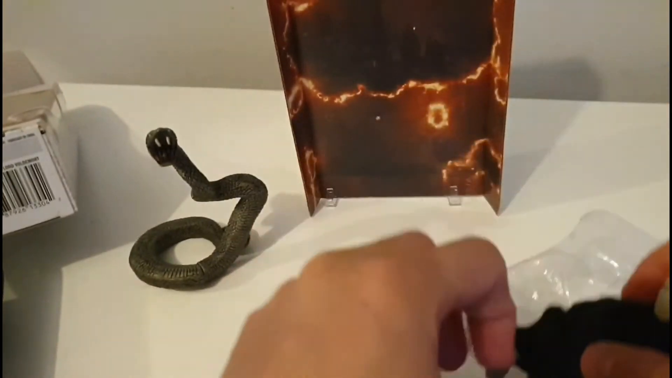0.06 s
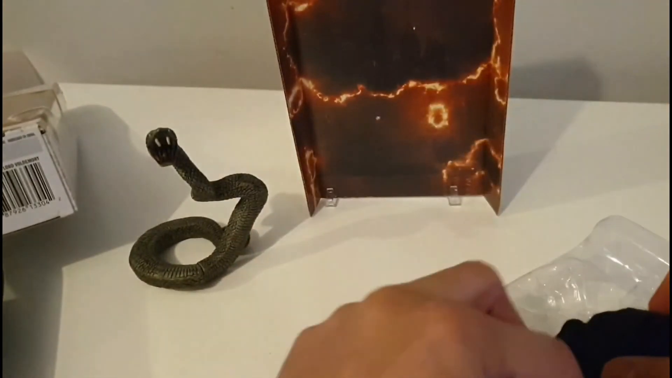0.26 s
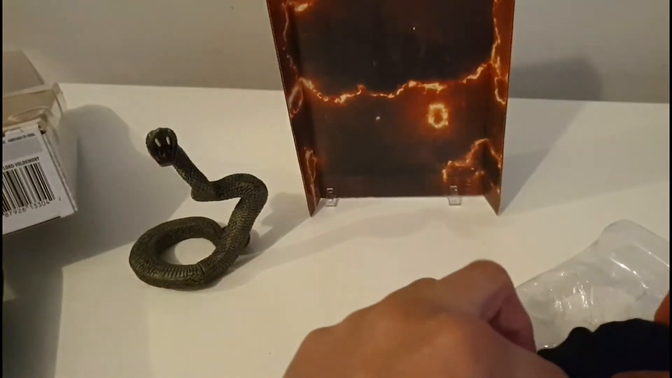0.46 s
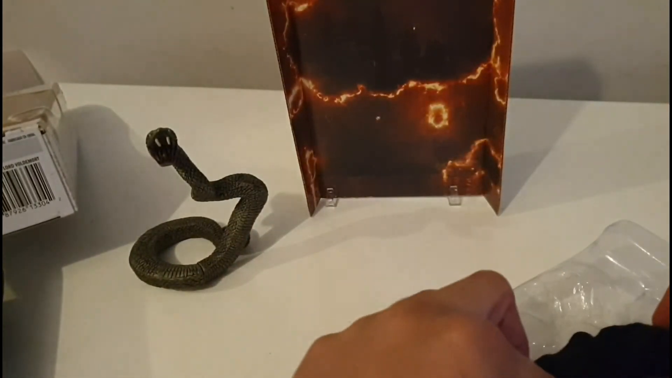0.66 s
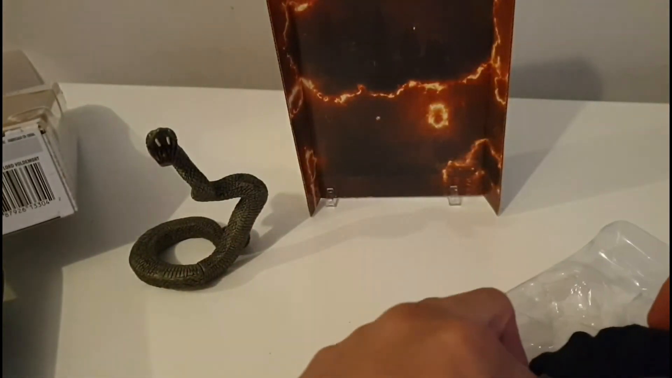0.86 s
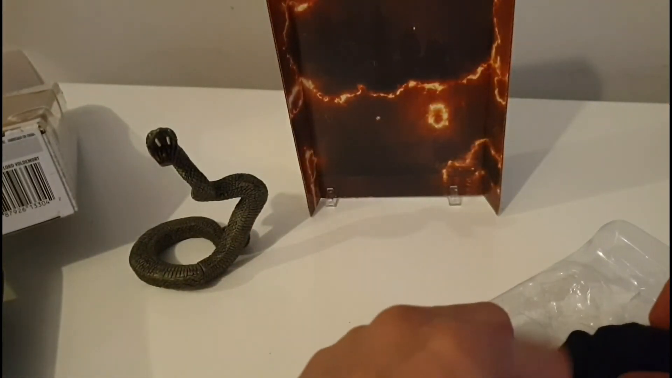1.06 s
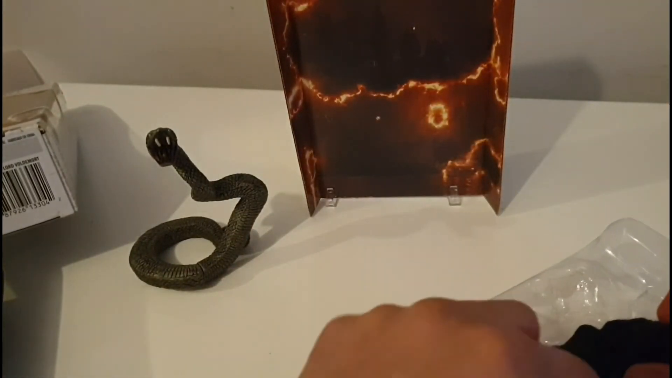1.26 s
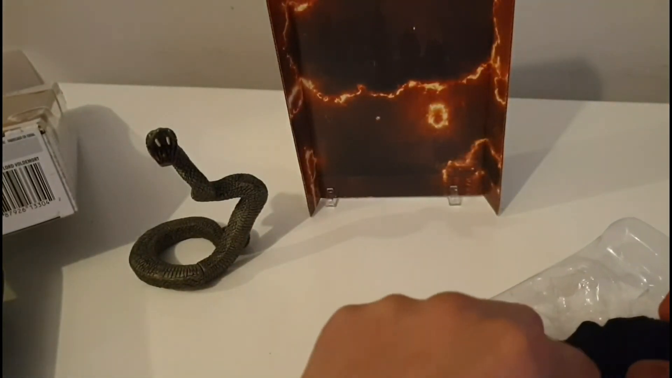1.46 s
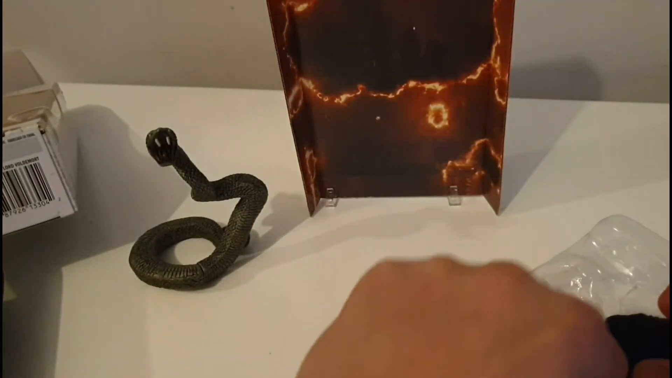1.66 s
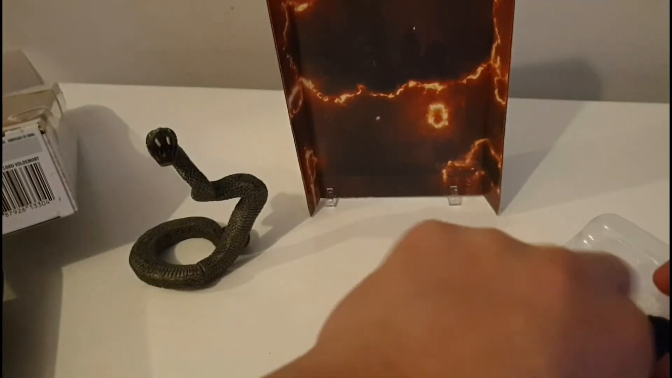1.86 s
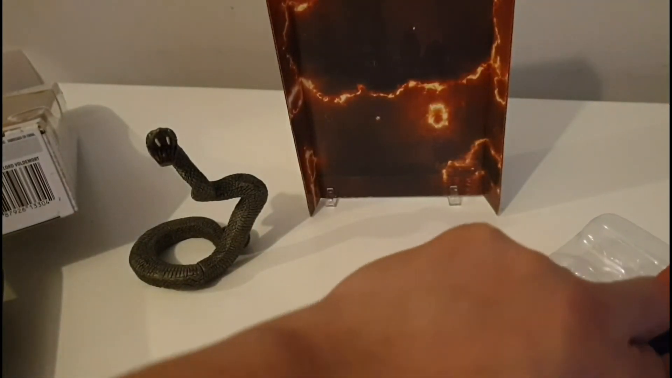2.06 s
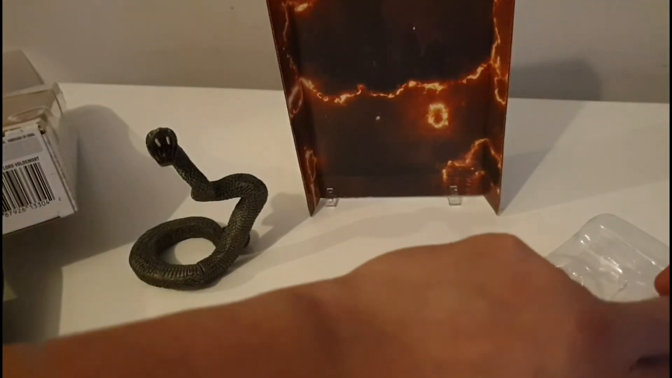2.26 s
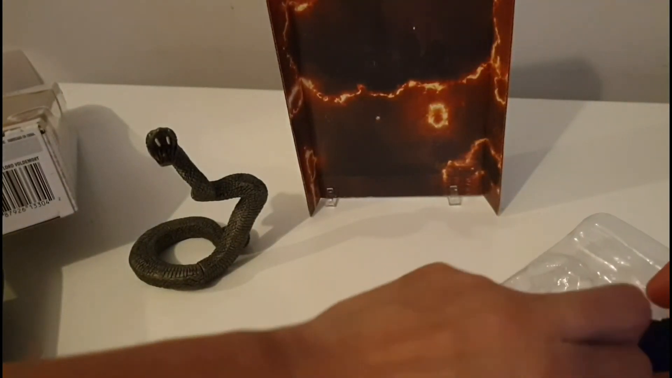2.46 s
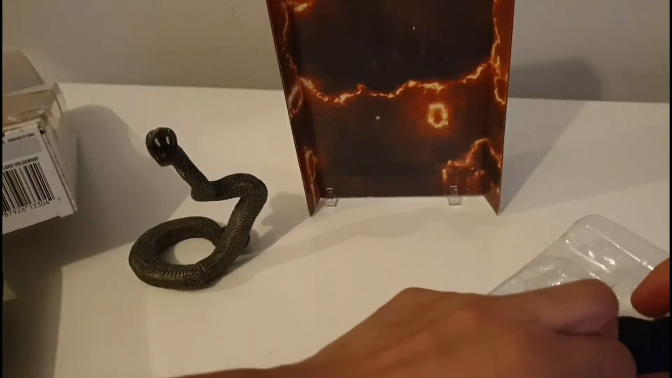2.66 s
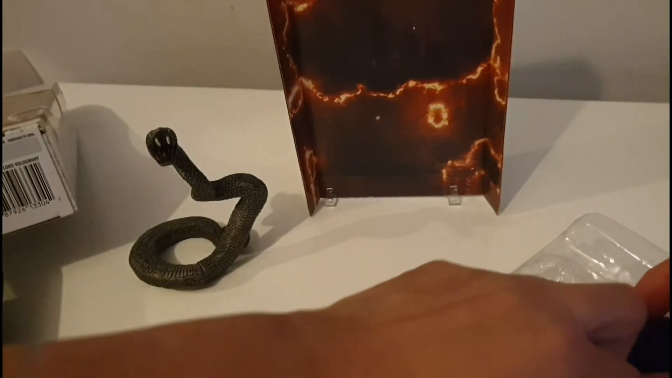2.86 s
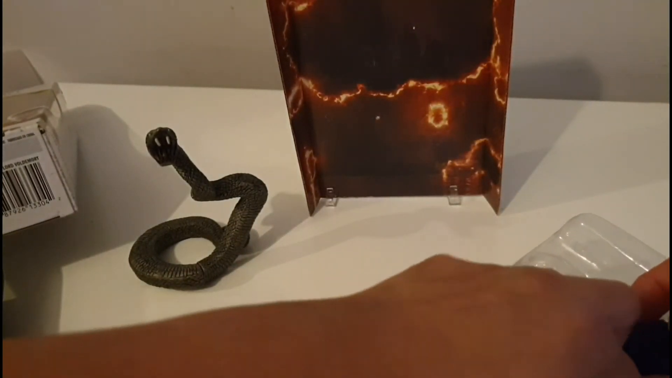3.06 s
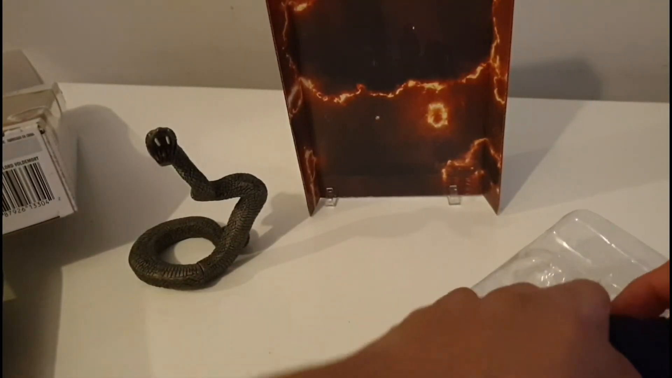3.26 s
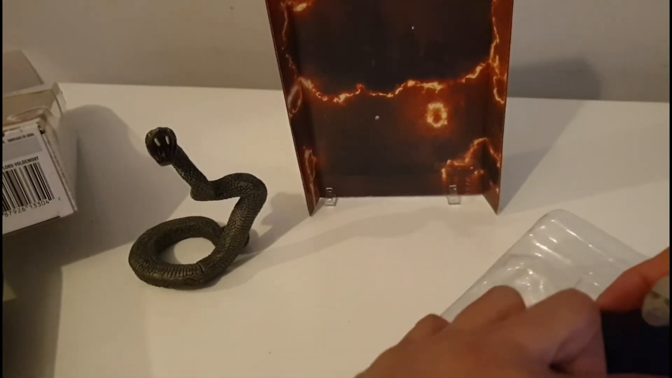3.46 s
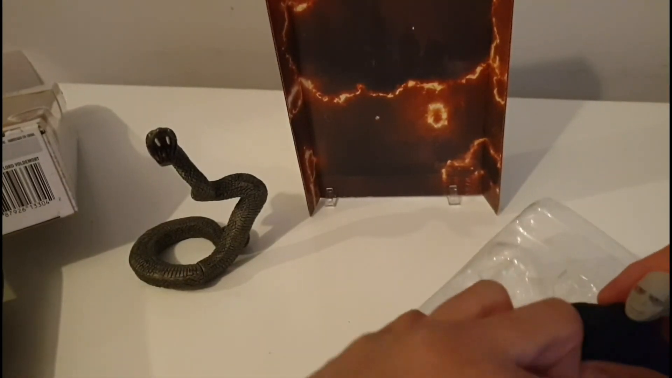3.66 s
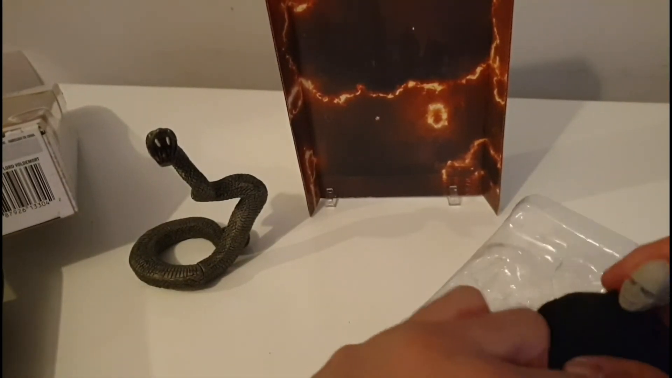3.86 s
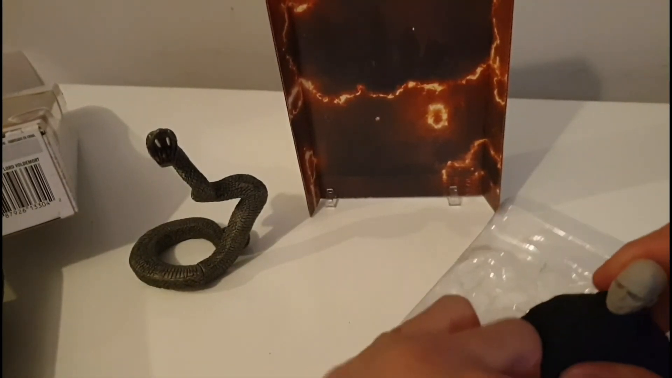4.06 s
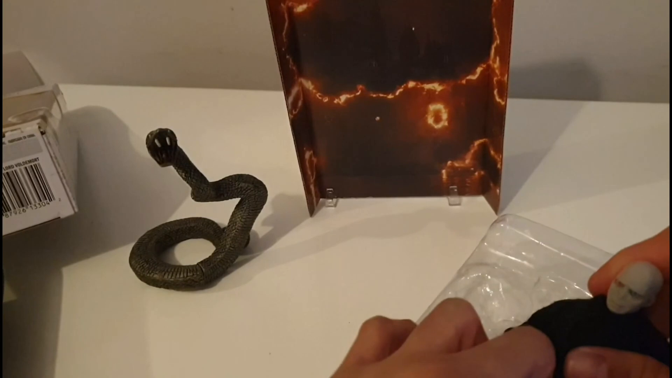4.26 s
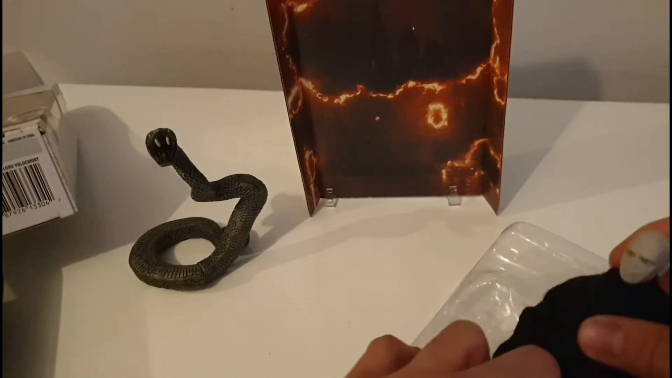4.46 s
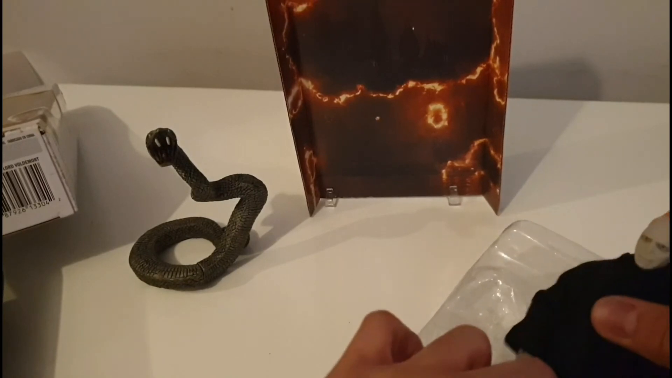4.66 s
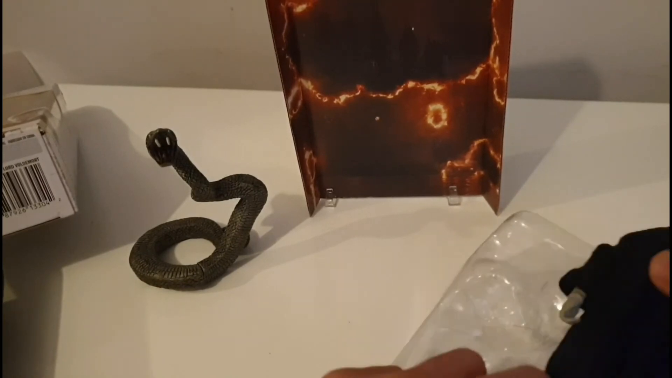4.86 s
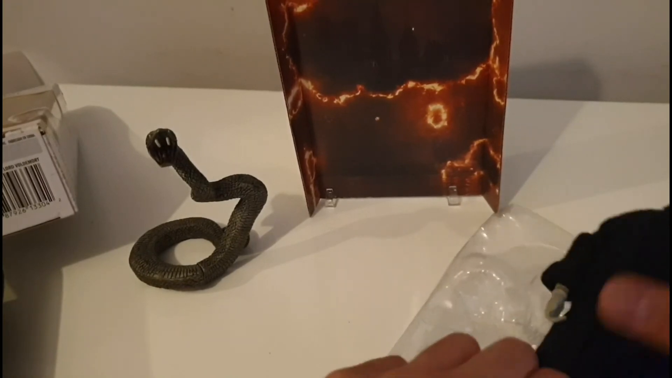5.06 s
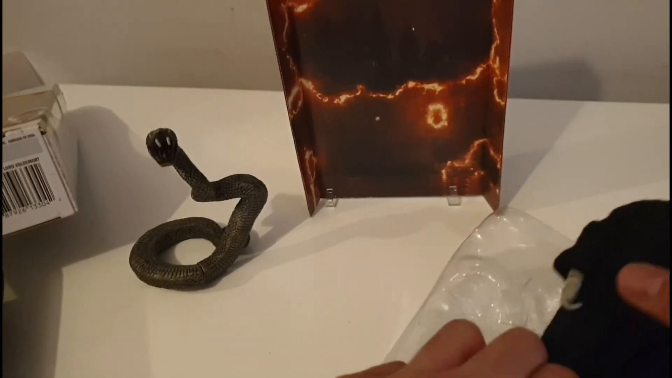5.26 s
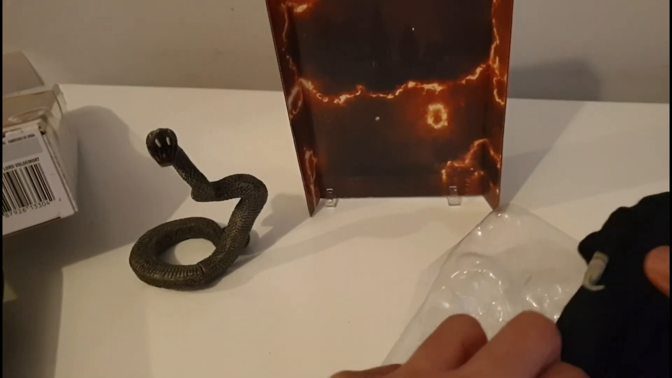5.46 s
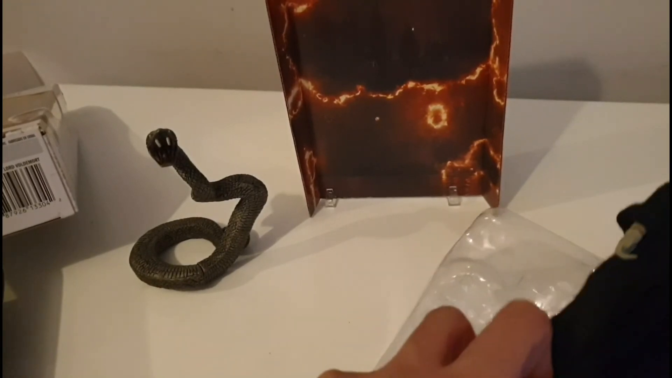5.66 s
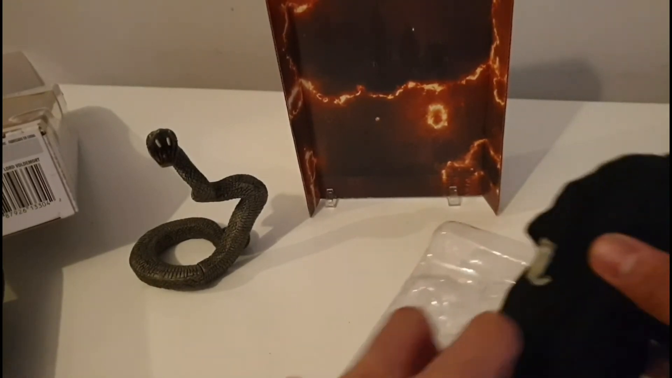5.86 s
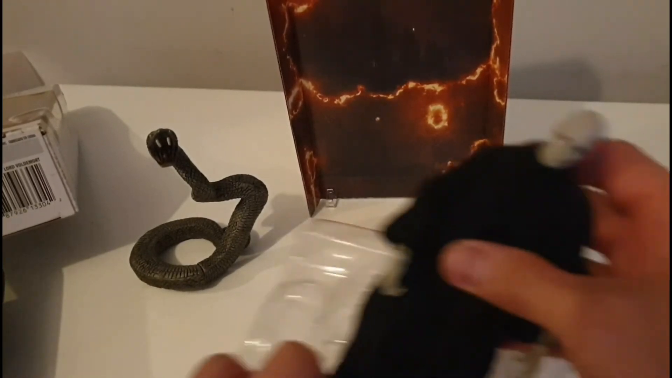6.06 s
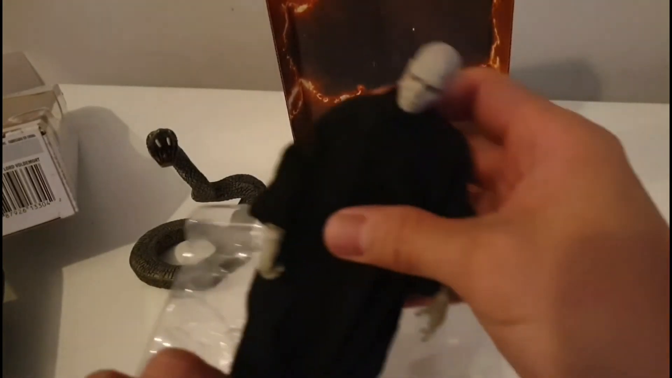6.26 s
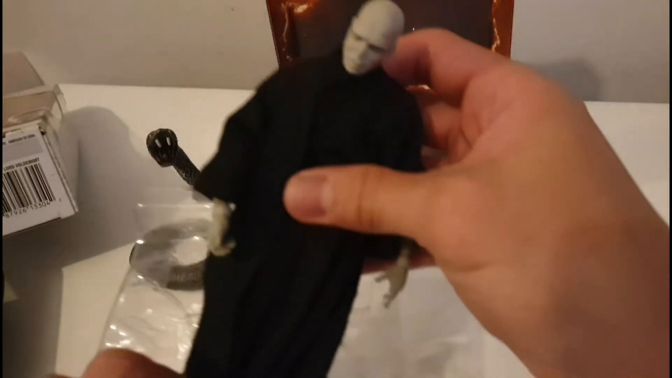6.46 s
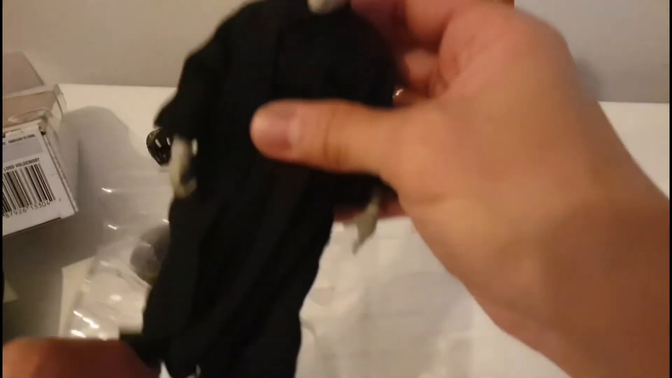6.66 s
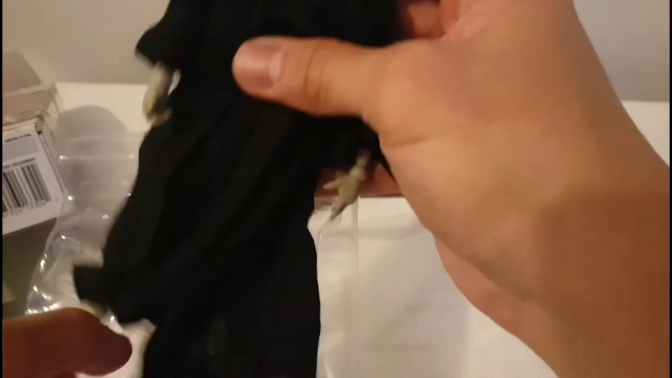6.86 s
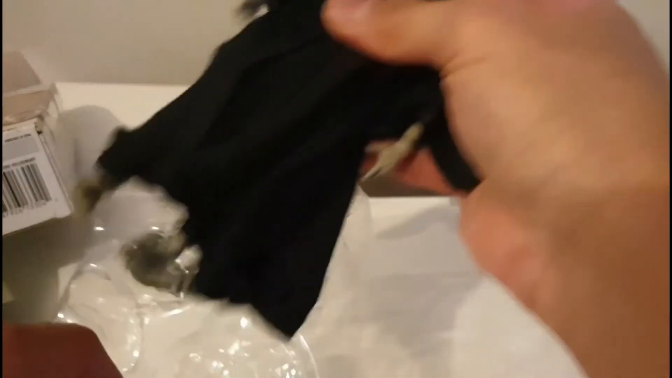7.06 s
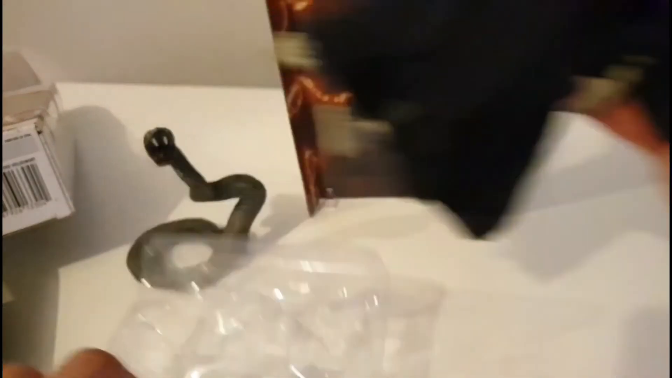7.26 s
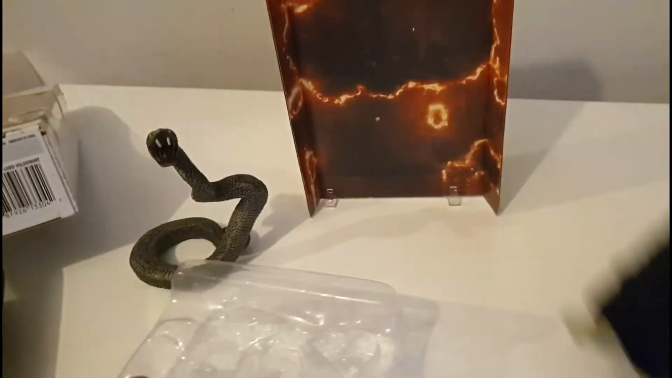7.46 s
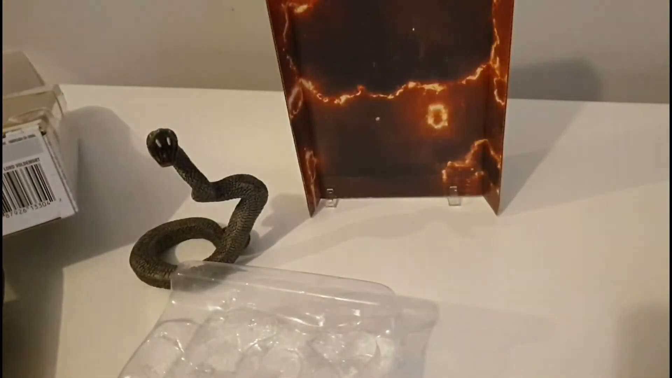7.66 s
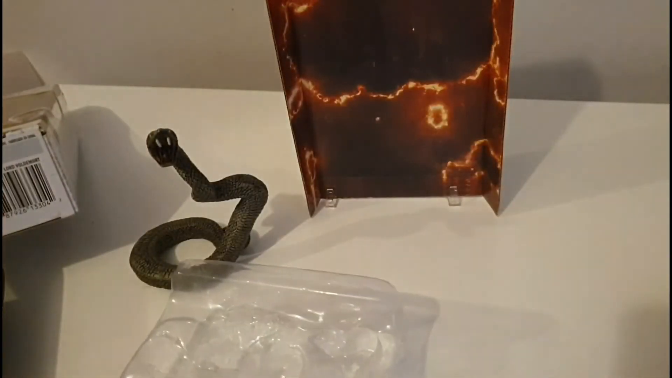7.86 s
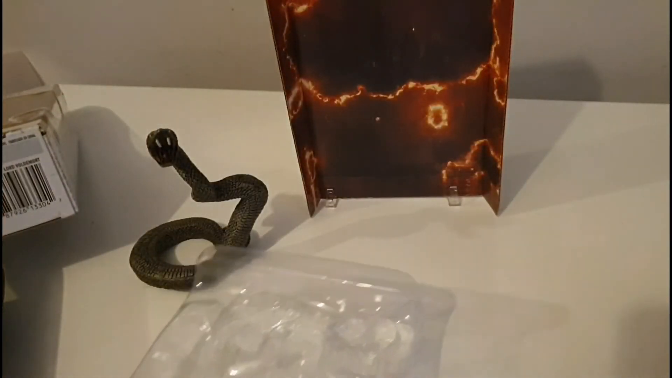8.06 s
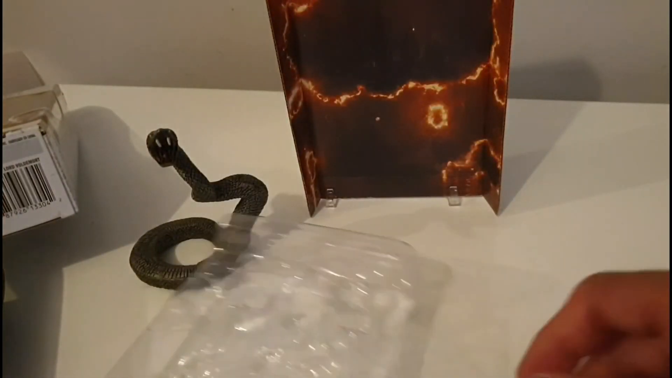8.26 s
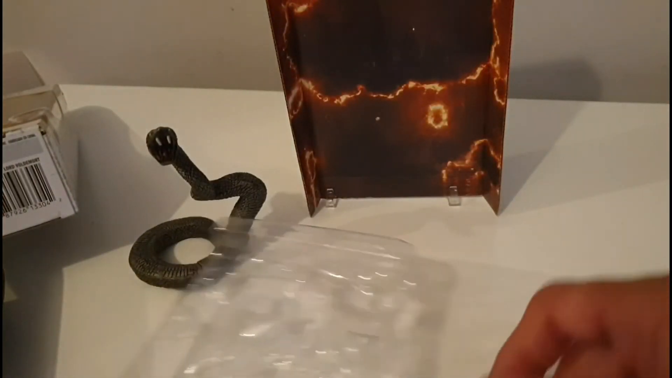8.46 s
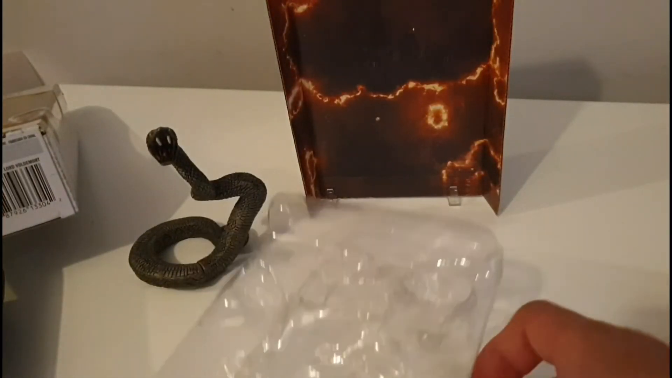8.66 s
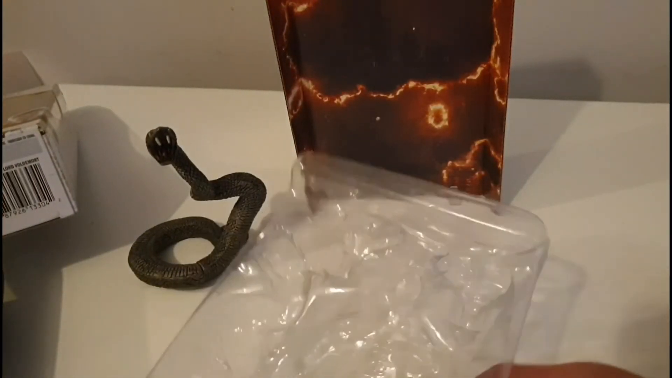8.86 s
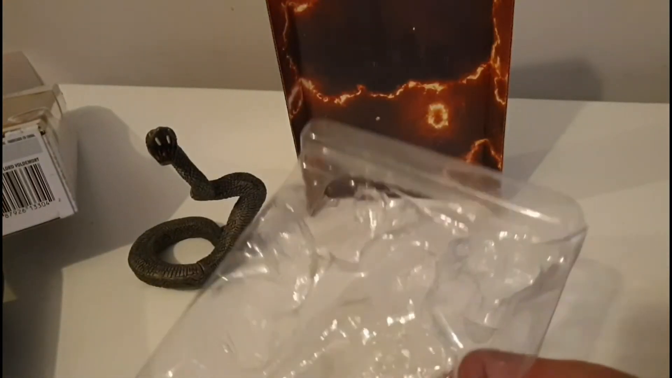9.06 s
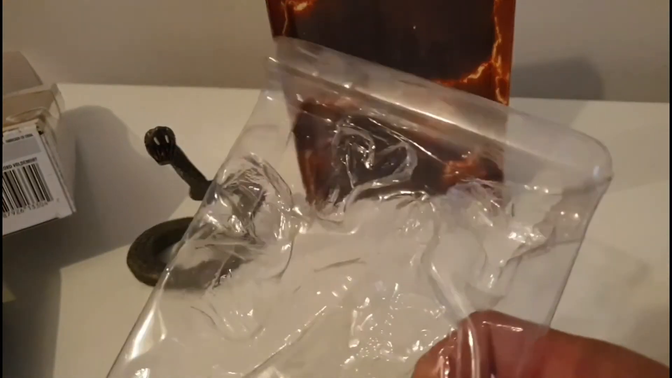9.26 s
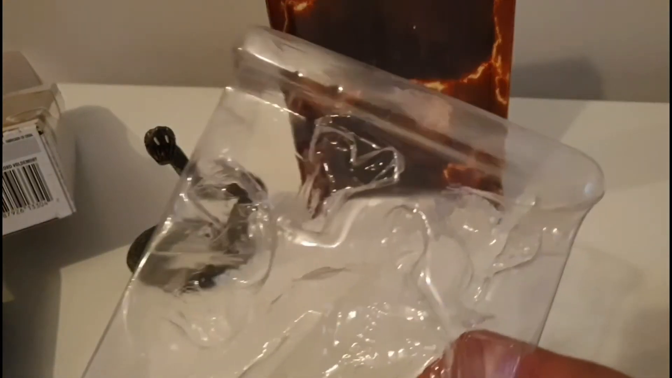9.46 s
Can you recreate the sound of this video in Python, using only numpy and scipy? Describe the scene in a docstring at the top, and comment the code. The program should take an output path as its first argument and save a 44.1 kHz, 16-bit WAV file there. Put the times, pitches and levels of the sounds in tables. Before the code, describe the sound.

Close, irregular snaps and crinkles of a plastic tray being flexed and handled, bumping a hollow table in a small quiet room.

```python
"""A stiff plastic tray buckles as hands pull a toy out of it, on a hollow table in a small room.
Each panel pops: it rings a few cycles, shakes the tray and snaps at its crease. Under the pops, small
panels crackle, sliding plastic scrapes, thin edges fizz and a slipping edge creaks. The table rumbles
under the hands and booms when the tray knocks it. Two close microphones hear it over a quiet hush."""
import sys
import numpy as np
from scipy import signal
from scipy.fft import rfft, irfft, next_fast_len
from scipy.io import wavfile
from scipy.ndimage import map_coordinates

SR = 44100
rng = np.random.default_rng(int(sys.argv[2]) if len(sys.argv) > 2 else 0)


def transcribe(u):
    """Save the signal u as a 16-bit wav file named by the first command-line argument.

    u: samples, shape (n,) or (channels, n), limited to [-1, 1]; the rate is SR.
    q: integer samples, one column per channel.
    """
    v = np.clip(np.atleast_2d(u).T, -1, 1)
    q = np.round(v * 32767).astype(np.int16)
    wavfile.write(sys.argv[1], SR, q)


N = 419371
TIME_S = np.arange(N) / SR


def gain_of(db):
    """Decibels to amplitude."""
    return 10 ** (np.asarray(db) / 20)


def unit_rms(x):
    """Scales to rms 1."""
    return x / np.sqrt(np.mean(x ** 2) + 1e-20)


def at_hz(points, hz):
    """Interpolates (f/Hz, value) points on a log-frequency axis."""
    f, value = np.transpose(points)
    return np.interp(np.log(hz + 1), np.log(f + 1), value)


def curve(rows, column):
    """One column of a timed table, at every sample."""
    rows = np.asarray(rows)
    return np.interp(TIME_S, rows[:, 0], rows[:, column])


def add(mix, start_s, sound):
    """Lays a sound into the mix."""
    part = mix[..., max(round(start_s * SR), 0):][..., :sound.shape[-1]]
    part += sound[..., :part.shape[-1]]


def coloured(x, spectrum):
    """Filters by (f/Hz, level/dB) points."""
    size = next_fast_len(x.shape[-1])
    response = gain_of(at_hz(spectrum, np.fft.rfftfreq(size, 1 / SR)))
    return irfft(rfft(x, size) * response, size)[..., :x.shape[-1]]


def resonance(x, hz, width_hz):
    """Band-pass with peak gain 1."""
    return signal.lfilter(*signal.iirpeak(hz, hz / width_hz, SR), x)


def clicks(per_s, spread_db):
    """Sparse clicks of random sign, many small and a few large."""
    size = gain_of(spread_db * np.minimum(rng.exponential(1, N), 5)) * rng.choice([-1, 1], N)
    return size * (rng.random(N) < per_s / SR)


# steady handling: t/s, rustle level/dB, fizz level/dB
HANDLING = [(0, -54, -58), (.76, -46.5, -62), (1.3, -37, -76), (1.95, -40.5, -78), (2.22, -58, -76),
            (2.9, -50.5, -43), (3.9, -37, -43), (4.45, -35.5, -78), (4.7, -46.5, -48), (5.17, -48, -43),
            (5.4, -45.5, -46.5), (6.25, -44, -52), (6.45, -67.5, -73), (7.95, -62.5, -68.5),
            (8.3, -47, -47), (8.9, -53.5, -60), (9.51, -43.5, -39.5)]
RUSTLE, FIZZ = 1, 2  # its columns
# plastic drags over itself: t/s, length/s, scrape level/dB, fizz level/dB
STROKES = [(-.07, 0.14, -22, -37), (0.31, 0.083, -25.5, -27.5), (0.828, .11, -26.5, -30.5),
           (3.046, 0.13, -36.5, -38.5), (4.458, 0.15, -19, -26.5), (5.543, 0.089, -33.5, -41),
           (7.343, 0.14, -43, -88), (8.305, 0.16, -39, -65), (8.96, 0.18, -28.5, -42.5),
           (7.801, 0.085, -30, -71), (7.147, 0.085, -30.5, -40), (7.525, 0.2, -37, -62)]

def hand_motion(column):
    """Restless gain of fingers that start and stop, with strokes swelling on top."""
    sway = sum(np.sin(2 * np.pi * (hz * TIME_S + rng.random())) / np.sqrt(hz)
               for hz in np.geomspace(3, 30, num=20))
    grip = gain_of(8.1 * unit_rms(sway) - 5.5)
    swells = sum(gain_of(levels_db[column - 1]) * np.sin(np.pi * np.clip((TIME_S - s) / length_s, 0, 1)) ** 2
                 for s, length_s, *levels_db in STROKES)
    return grip * gain_of(curve(HANDLING, column)) + swells


# tray resonances: f/Hz, width/Hz, level/dB
TRAY_MODES = [(1026, 500, 4.5), (1370, 830, 2.5), (2410, 1200, 0.5), (3460, 400, -12.5), (514, 83, -5.5)]

def tray_ring(drive):
    """The whole tray resonates to a drive."""
    return sum(gain_of(db) * resonance(drive, hz, width_hz) for hz, width_hz, db in TRAY_MODES)


def scrape():
    """Sliding plastic rings the tray with dense clicks."""
    friction = tray_ring(clicks(per_s=3000, spread_db=3.5))
    return gain_of(-4.5) * hand_motion(RUSTLE) * unit_rms(friction)


# spectrum of thin plastic: f/Hz, level/dB
FILM_SPECTRUM = [(2350, -62), (4000, -0.5), (4580, -3.5), (9040, -9), (13300, -8.5), (14700, -16),
                 (15500, -55)]

def fizz():
    """Thin edges of the plastic fizz in the treble."""
    return hand_motion(FIZZ) * unit_rms(coloured(clicks(per_s=3100, spread_db=4.5), FILM_SPECTRUM))


def crackle():
    """Twelve panels give small pops at random."""
    panels_hz = np.geomspace(850, 3200, num=12) * rng.uniform(0.8, 1.05, 12)
    ticks = sum(signal.oaconvolve(clicks(per_s=3.5, spread_db=2.0), pop(0, hz, snap_db=-19.5))[:N]
                for hz in panels_hz)
    return gain_of(curve(HANDLING, RUSTLE) + 3.5) * unit_rms(ticks)


# modes of the hollow table: f/Hz, level/dB, t60/s
TABLE_MODES = [(237.1, -2, 0.24), (144, -6, 0.11), (190, -10, .15), (334, -7, 0.18), (391.7, -5.5, 0.16),
               (453, -7.5, 0.19)]
BOOM_HZ, BOOM_T60_S = 80.1, 0.54

def table_rumble():
    """The hands press on the top all along and keep it rumbling."""
    push = rng.standard_normal((2, N)) * gain_of(0.65 * curve(HANDLING, RUSTLE))
    boom = gain_of([[4], [-10]]) * resonance(push, BOOM_HZ, width_hz=54)
    modes = sum(gain_of(db - 5) * resonance(0.54 * push[0] + push, hz, width_hz=60)
                for hz, db, _ in TABLE_MODES)
    return boom + modes


# spectrum of the quiet room: f/Hz, level/dB
HUSH_SPECTRUM = [(18, -42), (30, 4), (197, -11), (431, -33), (995, -6), (3870, -24.5), (8480, -40),
                 (13600, -31), (15500, -44.5)]

def hush(rms_db=-56.5):
    """Room noise, partly common to both channels."""
    noise = rng.standard_normal((3, N))
    return gain_of(rms_db) * unit_rms(coloured(noise[:2] + 1.3 * noise[2], HUSH_SPECTRUM))


def pop(db, hz, snap_db, t60_cycles=12.7):
    """One panel rings a few cycles, shakes the whole tray, and its crease snaps."""
    t = np.arange(1600) / SR
    shake, hiss = rng.standard_normal((2, len(t)))
    panel = np.sin(2 * np.pi * hz * t) * gain_of(-60 * t * hz / t60_cycles) * (1 - np.exp(-t / 0.000067))
    tray = tray_ring(shake * np.exp(-t / 0.0031))
    body = panel / abs(panel).max() + 1.19 * tray / abs(tray).max()
    body = signal.lfilter(*signal.butter(3, 5000, fs=SR), body)  # the stiff body gives no treble
    snap = coloured(hiss, FILM_SPECTRUM) * np.exp(-t / 0.0045) * (1 - np.exp(-t / 0.0001))
    return gain_of(db) * (body / abs(body).max() + gain_of(snap_db + 6.0) * snap / abs(snap).max())


# buckling panels: t/s, level/dB, f/Hz, relative snap level/dB
POPS = [(0.168, -21.5, 1740, -22), (0.265, -10, 980, -23), (0.445, -15, 1230, -35),
        (0.567, -17.5, 1700, -10), (0.598, -18, 1250, -28), (0.85, -9.5, 1290, -6),
        (0.998, -10.5, 1220, -18), (1.057, -10.5, 1040, -28), (1.12, 0.5, 1050, -17),
        (1.247, -7, 1000, -11), (1.363, -3, 1190, -15), (1.422, -3.5, 1580, -21), (1.492, -2, 4040, -10.5),
        (1.628, -6, 4500, -3.5), (1.821, -7.5, 1180, -42), (1.899, -21.5, 1370, -9),
        (1.963, -18, 1720, -42), (1.993, -14.5, 1420, -46), (2.077, -14.5, 1500, -52),
        (2.151, -15.5, 1463, -41), (2.365, -17, 1420, -49), (2.394, -20.5, 1720, -45),
        (2.442, -5.5, 1650, -39), (2.466, -10, 1740, -39), (2.505, -15, 1310, -40), (2.6, -15.5, 1810, -27),
        (3.071, -17.5, 1120, -1), (3.136, -11, 2310, -31), (3.183, -11.5, 820, -20),
        (3.224, -13.5, 2460, -39), (3.259, -14, 2520, -40), (3.375, -10, 2600, -21.5),
        (3.537, -15, 1950, -39), (3.84, -8.5, 4360, -5), (3.963, -7, 1480, -38), (4.022, -1.5, 1130, -2.5),
        (4.046, -4.5, 4700, -8), (4.096, -6, 1830, -2), (4.161, -9.5, 4540, -11.5),
        (4.274, -14, 1050, -1.5), (4.322, -4.5, 1020, -7.5), (4.469, 0.5, 1390, -32), (4.487, -1, 970, -8),
        (4.517, -4, 1010, -21), (4.872, -7, 1090, -39), (4.912, 3, 784, -23.5), (5.248, -16.5, 1060, -13),
        (5.649, -19, 3660, -3), (5.732, -9.5, 1730, -12), (5.953, -3, 1390, -17), (5.994, -8.5, 1060, -18),
        (6.17, -2.5, 2320, -16.5), (6.186, -4.5, 1370, -11.5), (6.308, -13.5, 3430, -6),
        (6.829, -21, 1586, -16), (7.103, -19.5, 1370, -47.5), (7.143, -7, 2050, -16.5),
        (7.543, -12, 960, -31), (7.808, -1.5, 2100, -42), (8.155, -0.5, 854, -14.5),
        (8.55, -4, 1190, -21.5), (8.68, -12, 970, -31), (9.055, -4.5, 995, -14), (9.283, -2, 2790, -5.5),
        (9.313, -1, 2300, -9), (9.485, -3.5, 2330, -13)]

def panel_pops():
    """Panels buckle in three parts of the tray in turn; one signal per part."""
    parts = np.zeros((3, N))
    for k, (s, db, hz, snap_db) in enumerate(POPS):
        add(parts[k % 3], s, pop(db, hz, snap_db))
    return parts


# tray hits table: t/s, knock level/dB, boom level/dB
KNOCKS = [(0.262, -29, -48), (1.121, -45, -30), (3.339, -30.5, -24), (4.319, -25, -29.5),
          (4.497, -26, -26.5), (4.539, -37.5, -18.5), (4.912, -18.5, -12), (5.729, -30, -32),
          (6.149, -30, -24), (7.147, -34.5, -45), (7.81, -24.5, -41), (8.153, -13.5, -35),
          (8.619, -39, -35.5), (8.979, -22, -35)]

def table_knocks():
    """Knocks ring the table's modes; its low boom comes up the stand into the left microphone."""
    out = np.zeros((2, N))
    t = np.arange(round(.7 * SR)) / SR
    for s, knock_db, boom_db in KNOCKS:
        scatter_db = rng.normal(0, 2.34, len(TABLE_MODES))
        modes = sum(gain_of(db + offset_db - 60 * t / t60_s) * np.sin(2 * np.pi * hz * t)
                    for (hz, db, t60_s), offset_db in zip(TABLE_MODES, scatter_db))
        modes *= 1 - np.exp(-t / 0.0034)
        boom = gain_of(boom_db - 60 * t / BOOM_T60_S) * np.sin(2 * np.pi * BOOM_HZ * t)
        boom *= 1 - np.exp(-t / 0.012)
        add(out, s, gain_of(knock_db) * modes / abs(modes).max() + boom * gain_of([[0], [-16]]))
    return out


# slipping edge: t/s, length/s, slip rate/Hz, first level/dB, f/Hz
CREAKS = [(.683, .055, 92, -22, 2500), (2.516, .065, 101, -14, 1550), (8.7745, .085, 87, -21, 1000)]

def creaks(fade_db_per_s=60, jitter_s=.0004):
    """An edge slips in jerks: a quick, fading row of small pops."""
    out = np.zeros(N)
    for s, length_s, slip_hz, db, hz in CREAKS:
        for t in np.arange(0, length_s, 1 / slip_hz):
            add(out, s + t + rng.normal(0, jitter_s), pop(db - fade_db_per_s * t, hz, snap_db=-45))
    return out


# tray position: t/s, left over right level/dB, left lag/ms
POSITION = [(0, -6.5, 0.068), (5, -3.5, 0.063), (7.2, -3.5, -0.15), (9.5, -4, -0.024)]

def microphones(x, extra_lag_ms, echo_gain=.3):
    """Two microphones hear the tray at different levels and instants; near surfaces add echoes."""
    half_db = curve(POSITION, 1) / 2
    half_lag = (curve(POSITION, 2) + extra_lag_ms) * SR / 2000
    pair = [map_coordinates(x, [np.arange(N) - side * half_lag], order=3) * gain_of(side * half_db)
            for side in (1, -1)]
    echoes = np.zeros((2, 700))
    echoes[:, 0] = 1
    at = rng.integers(12, 400, (2, 9))
    np.put_along_axis(echoes, at, echo_gain * rng.choice([-1, 1], at.shape) * np.exp(-at / 250), 1)
    return signal.oaconvolve(np.array(pair), echoes, axes=1)[:, :N]


# room decay: f/Hz, t60/s
ROOM_DECAY = [(200, 0.64), (1400, 0.38), (4000, 0.23)]

def reverb(x, level_db=-13):
    """Wall reflections: sparse taps of random sign, each band dying at its own speed."""
    taps = np.zeros((2, SR // 2))
    at = np.arange(300, SR // 2 - 20, 20) + rng.integers(0, 20, (2, (SR // 2 - 301) // 20))
    np.put_along_axis(taps, at, rng.choice([-1., 1.], at.shape), 1)
    taps[1] = .7 * taps[0] + 1.2 * taps[1]  # channels partly alike
    hz, t, bands = signal.stft(taps, SR, nperseg=256)
    decay = gain_of(-60 * t / at_hz(ROOM_DECAY, hz)[:, None])
    tail = signal.istft(bands * decay, SR, nperseg=256)[1]
    return gain_of(level_db) * signal.fftconvolve(x[None], tail / np.linalg.norm(tail[0]), axes=1)[:, :N]


def scene():
    """Each part of the tray lies a little apart and has its own echoes; table and hush join directly."""
    rustle = scrape() + fizz() + crackle()
    pops = panel_pops()
    pops[0] += creaks()
    lags_ms = (0.0011, -0.03, 0.013, 0.076)
    tray = sum(microphones(part, ms) + reverb(part) for part, ms in zip([rustle, *pops], lags_ms))
    return tray + table_rumble() + table_knocks() + hush()


def record(dry, low_hz=45, high_hz=15300):
    """The loudest pops clip; then the band is limited."""
    clipped = np.clip(dry, -1, 1)
    highpassed = signal.lfilter(*signal.butter(2, low_hz, "high", fs=SR), clipped)
    lowpass = signal.firwin(255, high_hz, window=("kaiser", 7), fs=SR)
    return signal.oaconvolve(highpassed, lowpass[None], "same")


dry = scene()
out = record(dry)
transcribe(out)
```